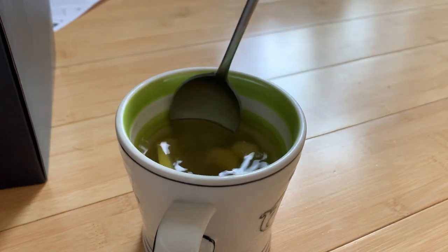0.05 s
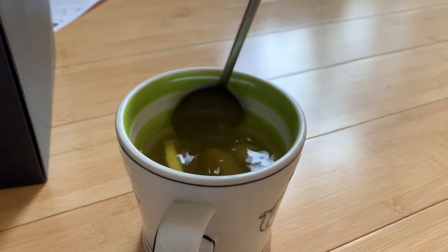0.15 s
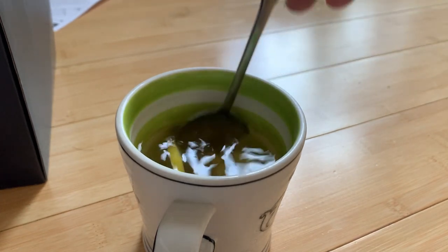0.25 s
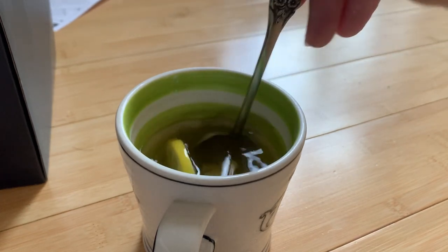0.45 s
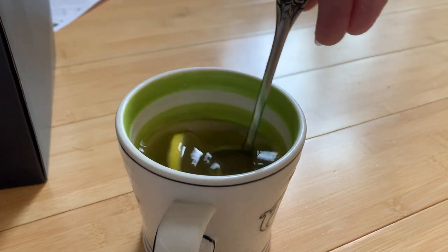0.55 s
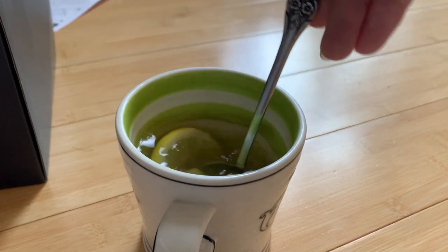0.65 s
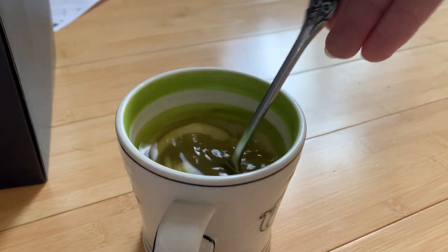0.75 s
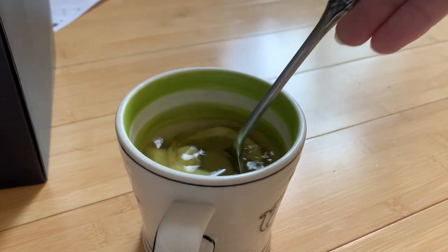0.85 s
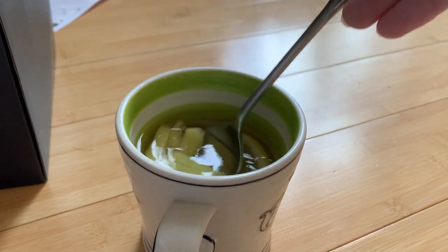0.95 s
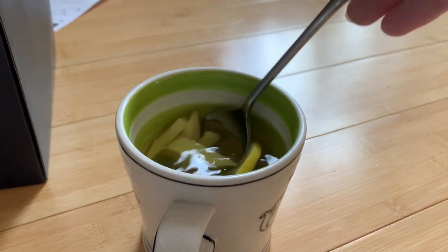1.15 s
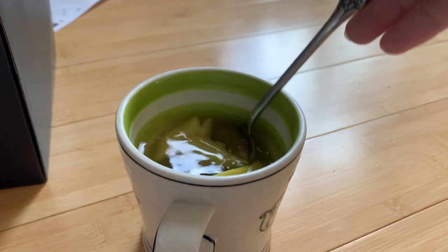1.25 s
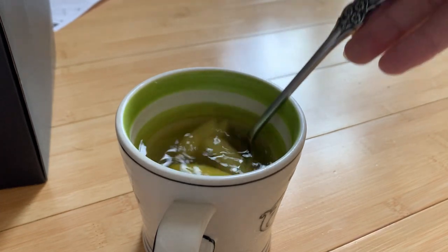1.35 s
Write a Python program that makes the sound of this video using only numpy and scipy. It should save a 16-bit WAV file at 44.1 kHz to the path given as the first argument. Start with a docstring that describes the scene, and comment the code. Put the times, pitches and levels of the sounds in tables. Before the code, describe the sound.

A metal spoon clinks and scrapes inside a ceramic mug of drink, then settles in a quiet room

```python
"""In a quiet room, close to a stereo microphone, a metal spoon stirs a drink in a ceramic mug on wood.
Over room tone and hum the drink plips (rising tones); the spoon drags (grainy friction through the mug's modes),
clinks on the wall, low down and on the bottom (struck modes, noise crack, wooden knock) and rasps up the wall
(coloured friction) with light bumps, small bubbles and a low noise slosh. It rubs to rest; a thin noise
spit comes just before the settling tick, and the last light rub dies away."""
import sys
import numpy as np
from scipy import signal
from scipy.fft import rfft, irfft
from scipy.io import wavfile

SR = 44100
rng = np.random.default_rng(int(sys.argv[2]) if len(sys.argv) > 2 else 0)


def wav_record(signal):
    """Record a signal, one row per channel, as 16-bit PCM in the file named by sys.argv[1]."""
    frames = np.transpose(np.atleast_2d(signal))
    bounded = np.clip(frames, -1, 1)
    # unit amplitude maps onto the largest positive 16-bit level
    quanta = np.round(bounded * 32767).astype(np.int16)
    wavfile.write(sys.argv[1], SR, quanta)


N = 61739
T = np.arange(N) / SR
SIDES = np.array([[1], [-1]]) / 2  # left, right


def amp(db):
    """Decibels to gain."""
    return 10 ** (np.asarray(db) / 20)


def unit(x):
    """Scale to rms 1."""
    return x / np.sqrt(np.mean(x ** 2))


def fade(t60, start=0):
    """Exponential decay from a start time, 60 dB down after t60 seconds."""
    age = np.maximum(T - start, 0)
    return (T >= start) * np.exp(-np.log(1000) * age / t60)


def curve(table, axis=1):
    """Gain from one dB column of a time table, silent outside it."""
    rows = np.array(table)
    inside = (T >= rows[0, 0]) * (T <= rows[-1, 0])
    return amp(np.interp(T, rows[:, 0], rows[:, axis])) * inside


def ring(x, response):
    """Pass a sound through an impulse response by convolution."""
    return irfft(rfft(x, 2 * N) * rfft(response, 2 * N), 2 * N)[..., :N]


def colour(x, points):
    """Causal minimum-phase filter with the given (f/Hz, level/dB) outline and unit energy."""
    hz, db = np.array(points).T
    grid = np.maximum(np.arange(N + 1) * SR / (2 * N), 1)
    outline_db = np.interp(np.log(grid), np.log(hz), db)
    cepstrum = irfft(np.log(amp(outline_db)))
    causal = 2 * cepstrum[:N] * (T > 0)
    response = irfft(np.exp(rfft(causal, 2 * N)))[:N]
    return ring(x, response / np.linalg.norm(response))


def pan(x, pan_db):
    """Set the left-minus-right level difference at the microphone."""
    return x * amp(pan_db * SIDES)


LEFT_LEAD_S = .00009


def spread(pair, side, pan_db=0):
    """Two unrelated sounds as middle and side; the left port hears the middle a little earlier."""
    middle, difference = pair
    early = np.interp(T + LEFT_LEAD_S, T, middle)
    stereo = np.array([early + side * difference, middle - side * difference])
    return pan(stereo / np.hypot(1, side), pan_db)


def impulse(start):
    """One unit push."""
    return (np.arange(N) == int(start * SR)) * 1.


GRAINS_PER_S, GRAIN_SPREAD_DB = 5000, 3.0
JUDDER_DB, JUDDER_HZ = 2.0, 130.6  # size of the random force steps, and how many per second


def friction():
    """Dense catches of uneven size whose force judders."""
    caught = rng.random(N) < GRAINS_PER_S / SR
    size_db = GRAIN_SPREAD_DB * np.minimum(rng.exponential(size=N), 5)
    catches = caught * rng.choice([-1, 1], N) * amp(size_db)
    judder = np.interp(T * JUDDER_HZ, np.arange(N), rng.standard_normal(N))
    return unit(catches * amp(JUDDER_DB * judder))


# spectral outline of the quiet room: f/Hz, relative density level/dB
ROOM_TONE = [(20, -32), (45, -9), (95, -3.5), (130, -7), (240, -9), (300, -12.5), (360, -5.5), (440, -24.5),
             (700, -24), (1200, -38), (1900, -34), (2500, -49.5), (5000, -58.5), (16000, -78.5)]
ROOM_DB, ROOM_SIDE, ROOM_PAN_DB = -59.5, .38, -4
HUM_HZ, HUM_DB, MIC_HISS_DB = 95.4, -68, -83.5
ECHO_DB, ECHO_T60_S, ECHO_DELAY_S = -11, 0.16, 0.0039


def room(direct):
    """A short diffuse echo (decaying noise response), low room noise, a faint hum and microphone hiss."""
    tail = rng.standard_normal((2, N)) * fade(ECHO_T60_S, ECHO_DELAY_S)
    echo = amp(ECHO_DB) * ring(direct, tail / np.linalg.norm(tail[0]))
    noise = colour(rng.standard_normal((2, N)), ROOM_TONE)
    air = amp(ROOM_DB) * spread(noise, ROOM_SIDE, ROOM_PAN_DB)
    hum = amp(HUM_DB) * np.sin(2 * np.pi * HUM_HZ * T)
    mic_hiss = amp(MIC_HISS_DB) * rng.standard_normal((2, N))
    return echo + air + hum + mic_hiss


PLIP_RISE_PER_S = 2.1  # pitch gained per second, as a fraction of the starting pitch


def bubble(start, hz, t60):
    """A fading tone that rises in pitch."""
    age = np.maximum(T - start, 0)
    cycles = hz * age * (1 + PLIP_RISE_PER_S * age / 2)
    return np.sin(2 * np.pi * cycles) * fade(t60, start)


# single plips of the drink: t/s, starting f/Hz, level/dB before panning, t60/s
PLIPS = [(.067, 926, -58, 0.027), (.176, 1002, -53.5, .012), (0.175, 1800, -57.5, .008),
         (.194, 1503, -56.5, 0.0049), (0.323, 371, -41.5, 0.068), (0.531, 368.4, -46, 0.079),
         (0.662, 330, -46.5, 0.1)]
BODY_PAN_DB = -2.5  # left minus right, for the drink and the rasp's body


def plips():
    """Single bubbles in the drink, each a short rising tone."""
    tones = sum(amp(db) * bubble(start, hz, t60) for start, hz, db, t60 in PLIPS)
    return pan(tones, BODY_PAN_DB)


# contact spots, in the order of the mode table's level columns
SPOTS = ("wall", "low", "bottom", "drag")
# modes of mug and spoon: f/Hz, free t60/s, relative level/dB at wall, low down, bottom and when dragged,
# left minus right level/dB, left lead phase/rad
MUG_MODES = [ (1735, .06, -31, -53, -40, -38, -3, 2.3), (1908, .07, -35, -39, -27, -41, 3, .2),
             (2090, .05, -55, -52, -36, -46, 0, 0), (3100, .03, -38, -56, -33, -64, 1, -2.6),
             (3945, .055, -34, -37, -34, -66, -1, -.7), (4058, .055, -42, -44, -26, -60, -4, -.7),
             (4260, .08, -36, -49, -32, -50, -5, -1.9), (4653, .055, -54, -30, -38, -47, -3, -.3),
             (4745, .05, -57, -36, -43, -57, -3, -.3), (5460, .05, -35, -58, -55, -81, -3, -1.1),
             (5680, .03, -49, -58, -37, -80, -3, -1.2), (6040, .05, -25, -51, -45, -56, -9, -1.9),
             (6140, .055, -34, -37, -33, -50, -5, -1.2), (6332, .05, -35, -38, -44, -60, -4, -.5),
             (6550, .04, -45, -49, -25, -54, 4, -1.0), (7550, .05, -29, -35, -39, -56, 1, 2.3),
             (7820, .03, -36, -51, -33, -46, -1, 2.0), (8220, .045, -23, -52, -47, -66, 2, 1.0),
             (8525, .05, -45, -54, -39, -62, 2, .8), (8997, .045, -28, -55, -52, -80, 0, .4),
             (9520, .022, -42, -38, -36, -59, 0, -.2), (10330, .03, -43, -36, -46, -70, 0, -1.4),
             (10640, .03, -40, -52, -39, -64, 2, -1.8), (11020, .035, -31, -47, -49, -58, 0, -2.4),
             (12150, .02, -44, -45, -52, -66, 0, 2.5), (13530, .025, -75, -62, -37, -70, 0, .6),
             (14800, .02, -47, -44, -50, -65, 0, -.6)]
CONTACT_S = 0.00047  # time constant of the soft onset


def mug_responses():
    """The ring of mug and spoon for each contact spot; every mode radiates in its own direction."""
    out = np.zeros((len(SPOTS), 2, N))
    for hz, t60, *levels, pan_db, lead in MUG_MODES:
        phase = 2 * np.pi * (hz * T + rng.random()) + lead * SIDES
        wave = pan(np.sin(phase), pan_db) * fade(t60)
        out += amp(levels)[:, None, None] * wave
    return dict(zip(SPOTS, out * (1 - np.exp(-T / CONTACT_S))))


# dragging on the bottom: t/s, level/dB over a ring of rms 1
DRAG = [(.2, -70.5), (.24, -56), (.29, -58.5), (.35, -56.5), (.41, -64.5), (.48, -58), (.53, -52),
        (.58, -55.5), (.61, -57), (.66, -53.5), (.72, -57.5), (.87, -53), (.96, -76.5)]
# outline of the dragging force: f/Hz, relative level/dB
DRAG_COLOUR = [(1800, -2.5), (4500, -0.5), (6300, 3), (8000, 2), (11000, 9.5), (15000, 6.5)]
PRESSED_T60_S = 0.082  # extra damping while the spoon presses on the mug


def drag(mug):
    """The friction of the sliding spoon keeps the damped modes of the mug ringing."""
    force = colour(friction(), DRAG_COLOUR)
    sing = ring(force, mug["drag"] * fade(PRESSED_T60_S))
    return unit(sing) * curve(DRAG)


# the mug's base on the wood: f/Hz, t60/s, relative level/dB, left lead phase/rad
BASE = [(135, .08, -38, .1), (200, .06, -40, .2), (296, .055, -32, .5), (388, .062, -27, .8),
        (490, .05, -37, 1.0), (700, .032, -24, 1.5), (816, .055, -31, 1.7), (1095, .045, -36, 2.3),
        (1300, .025, -39, 2.6)]


def base_response():
    """The dull knock of the mug on the wood: low, short modes of alternating sign."""
    modes = 0
    for k, (hz, t60, db, lead) in enumerate(BASE):
        wave = np.sin(2 * np.pi * hz * T + lead * SIDES)
        modes = modes + (-1) ** k * amp(db) * wave * fade(t60)
    return modes * (1 - np.exp(-T / CONTACT_S))


# blows of the spoon: t/s, spot, ring gain level/dB, contact crack level/dB, wood knock gain level/dB,
# extra damping by the held spoon t60/s
CLINKS = [(0.2249, "wall", 1, -15.5, -25, .25), (0.306, "low", 0.5, -23.5, -24, .6),
          (0.3154, "low", -5, -35, -27, .6), (0.3721, "bottom", 0.5, -5, 2.5, .4)]
# outline of the contact crack: f/Hz, relative level/dB
CRACK = [(200, -15), (1000, -3), (2200, 6), (2700, -5.5), (3300, 4), (4400, -6.5), (5200, -19), (6200, 0.5),
         (7100, -15), (7900, -4.5), (10000, -0.5), (11700, -16.5), (14000, -11), (16000, -10)]
CRACK_T60_S = 0.032
LEAD_IN_DB, LEAD_IN_T60_S = -16, 0.013  # level against the blow's push; growth time towards the blow


def clinks(mug, base):
    """A short grainy swell leads into each blow: modes ring, a noise burst cracks, the wood knocks."""
    out = 0
    for start, spot, ring_db, crack_db, knock_db, held_t60 in CLINKS:
        burst = rng.standard_normal((2, N)) * fade(CRACK_T60_S, start)
        crack = colour(burst / np.linalg.norm(burst[0]), CRACK)
        growth = (T < start) * np.exp(-np.log(1000) * np.abs(T - start) / LEAD_IN_T60_S)
        lead_in = friction() * growth
        push = impulse(start) + amp(LEAD_IN_DB) * lead_in / np.linalg.norm(lead_in)
        response = amp(ring_db) * mug[spot] * fade(held_t60) + amp(knock_db) * base
        out = out + ring(push, response) + amp(crack_db) * crack
    return out


# rasp along the wall: t/s, body level/dB, hiss level/dB, both before colouring and panning
RASP = [(.36, -51, -95), (.39, -51, -94), (.48, -57, -60), (.54, -50, -68), (.61, -53.5, -60.5),
        (.69, -52, -50.5), (.735, -46, -49), (.785, -44, -41), (.815, -48, -46), (.838, -51.5, -49.5),
        (.86, -47.5, -47.5), (.905, -61, -54), (.96, -64.5, -61), (1.02, -77, -72), (1.08, -74, -88)]
# outlines of the low grind and the bright hiss: f/Hz, relative level/dB
RASP_BODY = [(60, -23), (150, -5.5), (380, -1), (700, -4.5), (1000, -8), (1400, -9), (2200, -13),
             (4000, -49.5)]
RASP_HISS = [(500, -27), (1500, -5), (1820, 3.5), (2200, -2), (3000, -1), (3450, 6), (3950, -1), (4400, 9),
             (5200, 4.5), (7100, -5.5), (7850, -5.5), (9500, -4), (11000, -17.5), (13500, -9.5),
             (15500, -13)]
BODY_SIDE, HISS_SIDE = 0.72, 0.37  # stereo width: side against middle


def rasp():
    """The same friction grains feed a low grind and a bright hiss."""
    grit = np.array([friction(), friction()])
    body = colour(grit * curve(RASP, axis=1), RASP_BODY)
    hiss = colour(grit * curve(RASP, axis=2), RASP_HISS)
    return spread(body, BODY_SIDE, BODY_PAN_DB) + spread(hiss, HISS_SIDE)


SWIRL_FROM_S, SWIRL_TO_S, SWIRL_LOW_HZ, SWIRL_HIGH_HZ = .5, .86, 330, 1350
SWIRL_DB, SWIRL_CYCLES = -1.5, 19.6  # level against the rasp's body curve; t60 in starting cycles


def swirl():
    """The swirl sheds small bubbles whose loudness follows the body of the rasp."""
    out = np.zeros(N)
    for when, pitch, strength in rng.random(size=(40, 3)):
        start = SWIRL_FROM_S + when * (SWIRL_TO_S - SWIRL_FROM_S)
        hz = SWIRL_LOW_HZ * (SWIRL_HIGH_HZ / SWIRL_LOW_HZ) ** pitch
        out += np.sqrt(strength) * bubble(start, hz, SWIRL_CYCLES / hz)
    return pan(amp(SWIRL_DB) * curve(RASP) * out, BODY_PAN_DB)


# light touches as the spoon slides and settles: t/s, ring gain level/dB, base gain level/dB
BUMPS = [(.522, -15, -28), (.659, -11, -21), (.774, -7, -18.5), (.791, -6.5, -26), (.857, -8, -32)]


def bumps(mug, base):
    """Light pushes set off the dragged ring of the mug and its base on the wood."""
    out = 0
    for start, ring_db, base_db in BUMPS:
        response = amp(ring_db) * mug["drag"] + amp(base_db) * base
        out = out + ring(impulse(start), response)
    return out


# the drink sloshes: t/s, level/dB before panning
SLOSH = [(.62, -88), (.68, -82), (.78, -58), (.86, -58.5), (.92, -51), (.98, -68), (1.06, -82)]
# outline of the slosh: f/Hz, relative level/dB
SLOSH_COLOUR = [(25, -18.5), (70, -7), (200, -6), (300, -12.5), (600, -45), (2000, -70)]


def slosh():
    """Low noise swells as the drink moves."""
    noise = colour(rng.standard_normal(N), SLOSH_COLOUR)
    return pan(noise * curve(SLOSH), BODY_PAN_DB)


# the resting spoon rubs: t/s, level/dB before colouring
REST = [(.9, -68.5), (1.0, -71.5), (1.09, -75), (1.1, -55.5), (1.13, -61.5), (1.18, -67.5), (1.25, -72),
        (1.31, -69), (1.45, -77)]
# outline of the rub and the tap's push: f/Hz, relative level/dB
REST_COLOUR = [(500, -12.5), (1550, -16.5), (1770, 3.5), (1900, 4), (2100, -13.5), (2500, -9.5), (3600, -9),
               (4200, -20), (6500, -24.5), (9000, -44), (16000, -50)]
# outline of the tap's ring: f/Hz, relative level/dB
TAP_SOFTNESS = [(2000, 0), (4500, 11), (5200, -29), (16000, -50)]
SETTLE_AT_S, TAP_DB, TAP_RING_DB, REST_SIDE = 1.0942, -32.5, -30, 0.54


def settle(mug):
    """The spoon rubs by friction and tips against the wall with a light tap that rings the mug."""
    rub = spread(np.array([friction(), friction()]), REST_SIDE) * curve(REST)
    tap = impulse(SETTLE_AT_S)
    contact = colour(rub + amp(TAP_DB) * tap, REST_COLOUR)
    tap_ring = ring(tap, colour(mug["drag"], TAP_SOFTNESS))
    return contact + amp(TAP_RING_DB) * tap_ring


SPIT_AT_S, SPIT_DB, SPIT_HZ, SPIT_T60_S = .9895, -48.5, 8330, 0.018


def spit():
    """The thin spit of a bursting bubble: a short bright noise."""
    burst = rng.standard_normal((2, N)) * fade(SPIT_T60_S, SPIT_AT_S)
    return amp(SPIT_DB) * colour(burst, [(SPIT_HZ / 2, -18), (SPIT_HZ, 0)])


def scene():
    """Spoon, mug and drink close to the microphone, in the room."""
    mug, base = mug_responses(), base_response()
    spoon = drag(mug) + clinks(mug, base) + rasp() + bumps(mug, base) + settle(mug)
    drink = plips() + swirl() + slosh() + spit()
    direct = spoon + drink
    return direct + room(direct)


TOP_HZ = 15750


def record(dry):
    """The recorder cuts the top with a steep elliptic low-pass."""
    low_pass = signal.ellip(10, .1, 80, TOP_HZ, fs=SR, output="sos")
    return signal.sosfilt(low_pass, dry)


dry = scene()
out = record(dry)
wav_record(out)
```